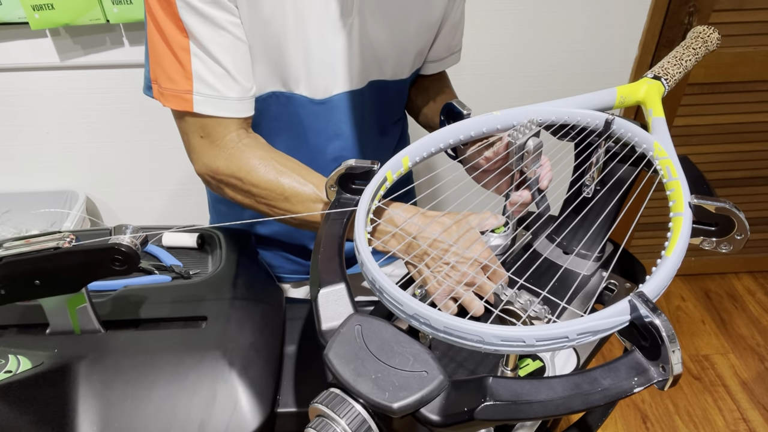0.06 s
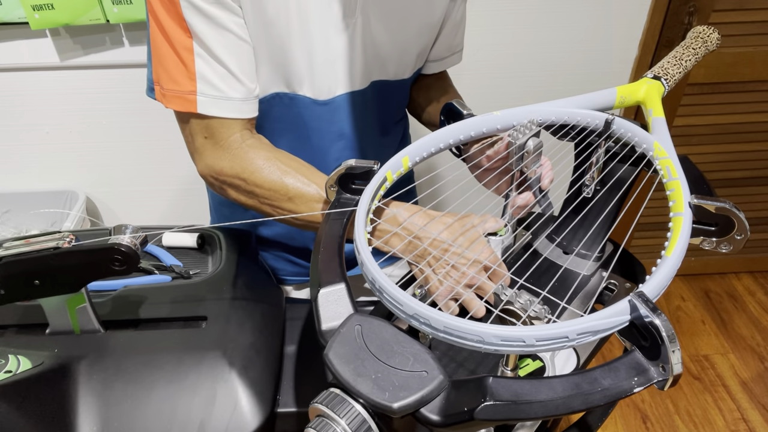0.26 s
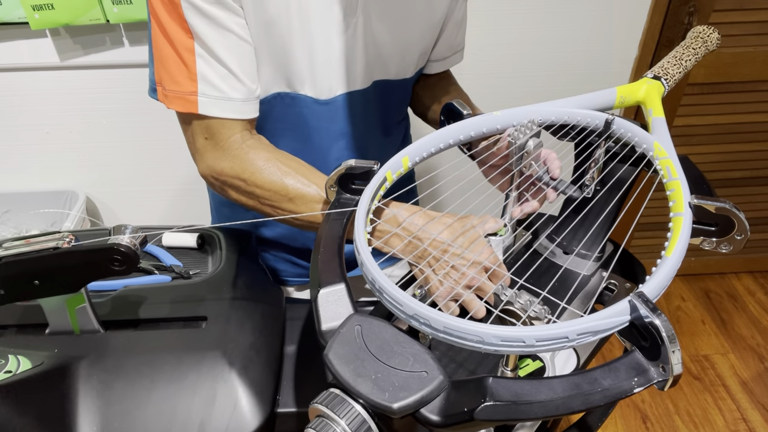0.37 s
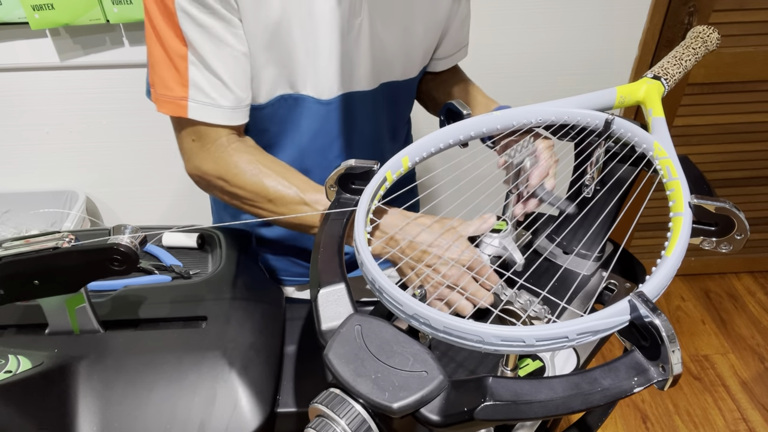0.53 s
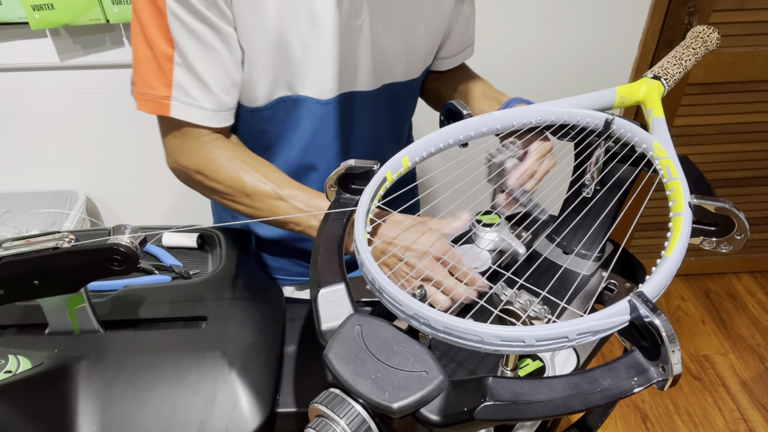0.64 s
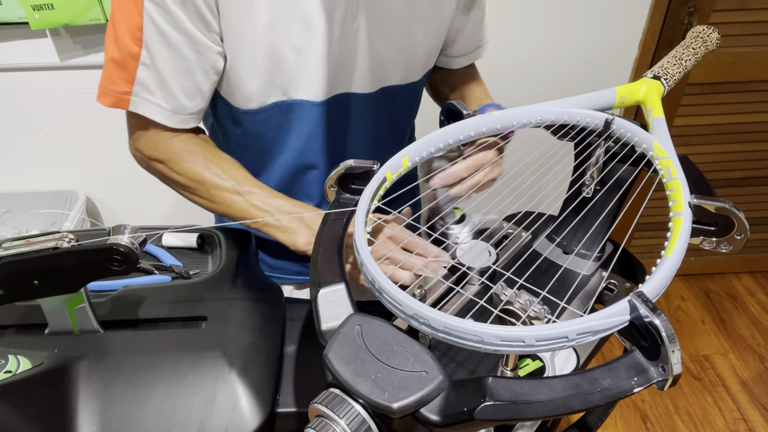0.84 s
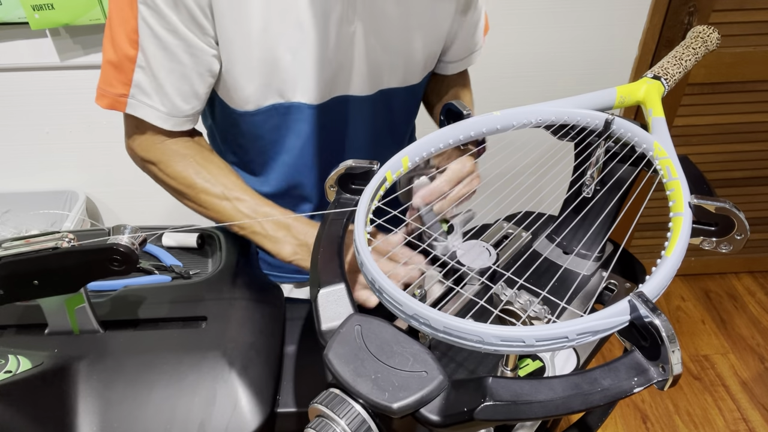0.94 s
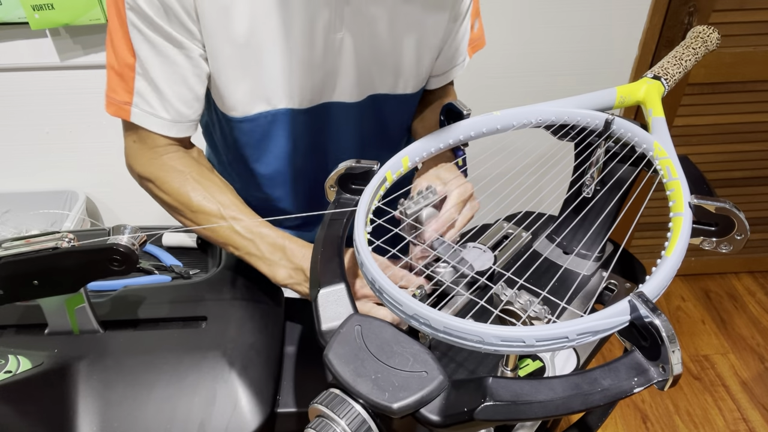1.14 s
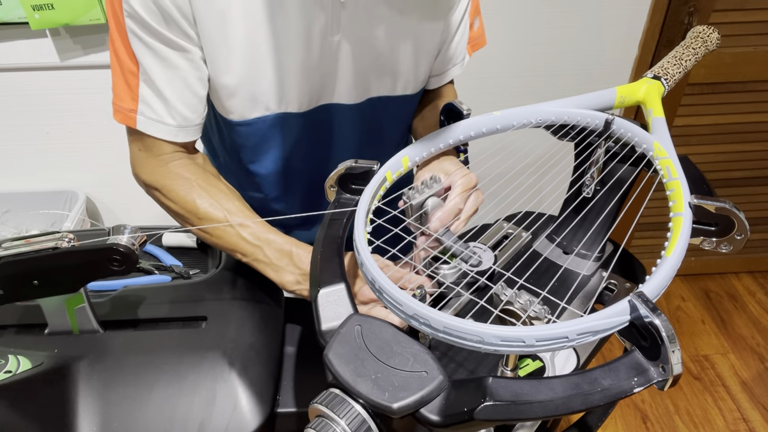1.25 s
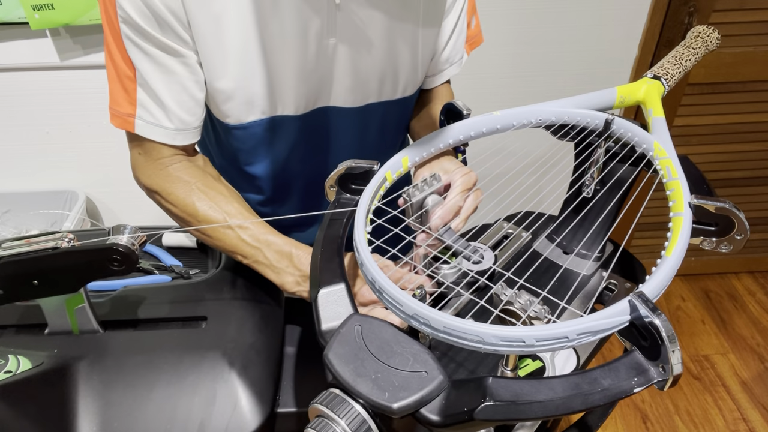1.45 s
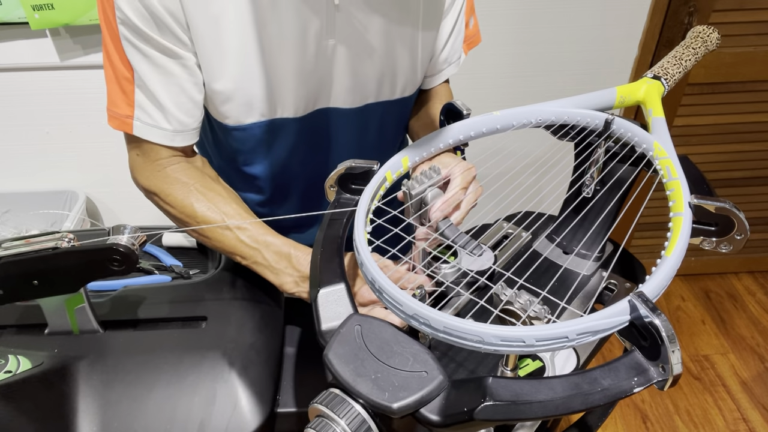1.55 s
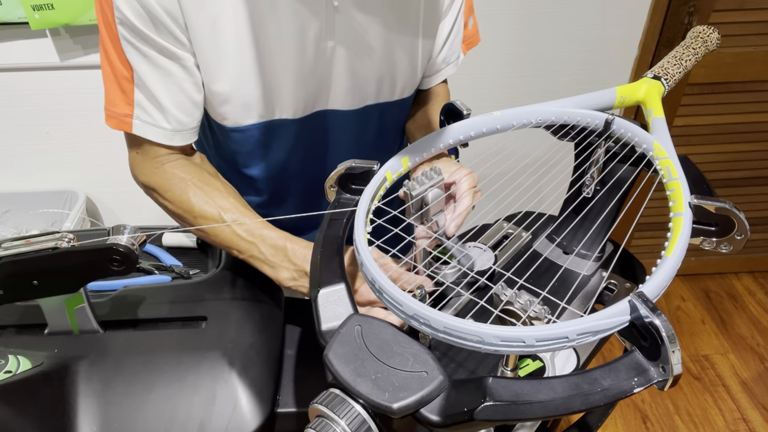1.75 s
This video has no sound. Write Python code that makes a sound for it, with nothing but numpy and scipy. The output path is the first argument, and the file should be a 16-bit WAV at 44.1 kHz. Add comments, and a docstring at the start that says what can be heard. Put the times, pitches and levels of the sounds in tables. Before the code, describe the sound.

Close to the microphone in a small, live room, a stringing machine's metal clamp clacks open, chatters along a rail and clacks shut. Softer metal clinks follow as the clamps are reset, with ventilation humming underneath.

```python
"""A racquet is strung on a stringing machine in a small, live room, close to a stereo microphone.
Over a low ventilation hum, a steel clamp snaps open at 0.23 s in a quick series of impacts. It slides
along its rail with friction and chatter, then locks at 0.6 s with a clack that excites the low modes
of the turntable. From 0.9 s fingers reset the clamps: a catch drops in, jaws clink, and the rail
rattles faintly until only the hum is left."""
import sys
import numpy as np
from scipy import signal
from scipy.fft import rfft, irfft, next_fast_len
from scipy.io import wavfile
from scipy.ndimage import map_coordinates

SR = 44100
rng = np.random.default_rng(int(sys.argv[2]) if len(sys.argv) > 2 else 0)


def put_to_file(sound):
    """Save the sound as 16-bit audio at rate SR, in the file named by the first command-line argument."""
    columns = np.atleast_2d(sound).T  # one column per channel
    safe = np.clip(columns, -1, 1)
    whole_steps = np.round(safe * 32767)
    wavfile.write(sys.argv[1], SR, whole_steps.astype(np.int16))


N = 79380
T = np.arange(N) / SR

# Levels are relative; t60 is the time a vibration takes to fall by 60 dB.
# Lever contacts on opening and on locking. Each row: start in seconds, level in dB, t60 in seconds.
RELEASE_CONTACTS = [(.2288, -19, 0.087), (.2324, -11.5, 0.01), (.2355, -16, 0.019), (.2404, -7.5, 0.021),
                    (.2455, -21.5, 0.024)]
LOCK_CONTACTS = [(.6001, -25, 0.072), (.6054, -15.5, 0.0041), (.6065, -8.5, 0.016), (.6088, -13, 0.013)]
# Normal modes of the struck parts. Each row: frequency in Hz, level in dB, t60 in seconds.
STEEL_MODES = [(6076, -12.5, 0.04), (8770, 1.5, .04), (9000, -2, 0.0074), (10050, 2, 0.051),
               (10840, -4.5, 0.027), (12470, -9.5, 0.045)]
CLAMP_BASE_MODES = [(1010, -37.5, 0.059), (1087, -16.5, 0.041), (1205, -24.5, 0.1)]
TURNTABLE_MODES = [(145.5, -3, 0.44), (165.4, -2.5, 0.24), (233.8, 1, 0.26), (303, -3.5, 0.24),
                   (364.3, -3, 0.38), (451, 2, 0.28), (476, 2.5, 0.21), (585, -13, .24), (721, -9.5, .21)]  # with the racquet
CATCH_MODES = [(1053, -37.5, 0.046), (2330, -30.5, 0.027), (2650, -33, .018), (3310, -30.5, 0.026),
               (3550, -31, 0.027), (4300, -39, 0.022), (5900, -33.5, 0.044)]
JAW_MODES = [(1295, -4, 0.049), (1960, 1, 0.02), (2750, -2, 0.026), (5920, -11, 0.05)]
JAW_PING = (3345, -1, 0.029)  # a single row
# Blows that reach the turntable. Each row: start in seconds, level in dB, tilt in dB per octave.
TURNTABLE_BLOWS = [(.25, -37, -7), (.608, -26.5, 1), (.626, -26.5, -2.5), (1.029, -42.5, 6.5)]
# Touches on the jaws. Each row: start in seconds, ring level in dB, tilt in dB per octave,
# extra ping level in dB, click level in dB.
JAW_TOUCHES = [(0.5494, -35, 0, -20, -53), (0.973, -41, 3, -2, -39.5), (0.984, -41, -3, -12, -47),
               (1.0255, -43, -7, -15, -35.5), (1.104, -45, -12, -8, -47), (1.242, -56.5, -3, -8, -46),
               (1.287, -43.5, -5.5, 9, -47), (1.504, -46.5, -2.5, 2, -46.5), (1.568, -37.5, -6, -12, -43.5),
               (1.605, -44, -18, -1.5, -47.5), (1.676, -42, 1.5, 1.5, -52), (1.762, -51, 0, 2, -50)]
# Light knocks of the clamps. Each row: start in seconds, click level in dB, an unused value,
# click t60 in seconds, ring frequency in Hz, ring level in dB.
CLAMP_KNOCKS = [(.079, -41.5, -1, 0.013, 1396, -48.5), (0.375, -47, 14, 0.019, 1083, -36.5),
                (0.439, -48.5, 6, 0.014, 2044, -37.5), (.444, -33, 6, 0.0079, 1850, -35),
                (0.458, -44.5, -10, 0.024, 1737, -36), (0.4883, -29.5, -2, 0.05, 1325, -30.5),
                (.494, -27, -2, 0.014, 3080, -28), (0.526, -41.5, -5, 0.025, 1810, -33.5),
                (0.5706, -40, 9.5, 0.11, 3190, -26), (0.639, -26.5, -16, 0.025, 1875, -28),
                (1.033, -46, -22, 0.015, 489, -35.5), (1.530, -55.5, 6, 0.081, 1432, -50)]
# Movements along the rail. Each row: start in seconds, length in seconds, level in dB.
RAIL_SLIDES = [(0.208, 0.025, -51.5), (0.49, 0.11, -53), (0.911, 0.13, -57.5), (0.949, 0.18, -58),
               (1.121, 0.168, -71), (1.488, 0.15, -63), (1.66, 0.32, -74)]
# Wavering and throbbing tones of the ventilation. Each row: frequency in Hz, level in dB.
HUM_TONES = [(86.1, -59), (119.5, -58)]
THROB_TONES = [(206, -53.5), (238, -57.5)]
# Noise spectra of the sources. Each row: frequency in Hz, spectral density in dB.
RELEASE_SPECTRUM = [(100, -39), (300, -7.5), (750, -4), (1700, 1.5), (2600, -2), (4200, -3.5), (7500, 0.5),
                    (9500, 8.5), (12000, -1.5), (14500, 1)]
LOCK_SPECTRUM = [(100, -14.5), (500, -10.5), (1100, 3), (2300, -6), (3500, -2), (5400, 0.5), (7500, -9),
                 (9500, -1.5), (12000, -8.5), (14500, -8)]
THUD_SPECTRUM = [(40, -30.5), (80, -14), (145, 6), (300, -4), (560, -1), (900, -6), (4000, -49)]
CLINK_SPECTRUM = [(300, -4), (1200, 5.5), (3600, 3.5), (4700, -3.5), (6000, -17.5), (9500, -23),
                  (14500, -37)]
TICK_SPECTRUM = [(100, -13.5), (500, -8), (1100, 4.5), (2000, 1.5), (3400, 2), (4600, -1), (6000, -4.5),
                 (9500, -1.5), (14500, -19)]
SLIDE_SPECTRUM = [(100, -12), (500, -0.5), (1300, -3.5), (3200, -9.5), (6000, -16), (9500, -21.5),
                  (14500, -31.5)]
AIR_SPECTRUM = [(20, -38), (45, -3), (70, -3), (130, 0), (230, -0.5), (330, -7.5), (450, -14.5),
                (700, -25.5), (1400, -30), (6000, -49.5), (15000, -57.5)]
# Reverberation time of the room. Each row: frequency in Hz, t60 in seconds.
ROOM_T60 = [(150, 0.8), (1000, 0.48), (3000, 0.42), (7000, 0.48), (14000, 0.41)]
# Level of the reverberant tail, with a dip near 7.7 kHz and a dull top that are not the room's own.
# Each row: frequency in Hz, level in dB.
TAIL_LEVEL = [(150, 6.5), (500, 6), (1200, -4), (3000, 0.5), (6200, -4), (7700, -15), (9500, -11),
              (14500, -9), (15600, -23.5)]
# Left-right coherence of near and diffuse sound. Each row: frequency in Hz, coherence from 0 to 1.
NEAR_COHERENCE = [(200, 0.95), (1100, 0.68), (2200, 0.52), (4500, 0.16), (9500, 0.48), (13000, 0.99)]
ROOM_COHERENCE = [(200, 0.86), (500, 0.26), (1100, 0.081), (4500, 0.14), (9500, 0.25), (13000, 0.94)]
# Phase between the microphone ports. Each row: frequency in Hz, lead of the left in radians.
MAIN_PHASE = [(200, 0.14), (1100, 0.28), (2200, -1), (4500, -3.5), (8500, -10), (10500, -4), (11300, -7),
              (15000, -5.5)]
JAW_PHASE = [(300, 0.5), (2700, -1.78), (3330, -5), (3570, -6), (5900, -10)]  # the jaws sound from another side
# Balance of the ports. Each row: frequency in Hz, left minus right in dB.
PORT_BALANCE = [(200, 1), (600, -1), (1500, -1.5), (4000, -0.2), (12000, 0.25)]


def lever(contacts, spectrum, ring_db):
    """Impact excitation: each contact gives a crack and rings the steel; the cracks add in power."""
    envelope = np.sqrt(sum((amp(db) * fade(s, t60)) ** 2 for s, db, t60 in contacts))
    crack = envelope * rippled(noise(spectrum))
    return crack + sum(amp(db + ring_db) * ring(s, STEEL_MODES) for s, db, _ in contacts)


def clamp_base():
    """Free vibration: the base rings on after the locking blow."""
    return ring(.6066, CLAMP_BASE_MODES)


def turntable(attack_s=0.0047, pivot_hz=287):
    """Structure-borne sound: each blow draws a dull thud and low modes from the heavy frame."""
    out = np.zeros((2, N))
    for s, db, tilt_db in TURNTABLE_BLOWS:
        thud = amp(-1.5) * fade(s, t60=0.23, attack_s=attack_s) * noise(THUD_SPECTRUM, ROOM_COHERENCE)
        modes = amp(-4) * ring(s, TURNTABLE_MODES, attack_s)
        tilt = lambda hz: amp(tilt_db * np.log2(np.clip(hz / pivot_hz, .5, 2)))
        out += filtered(amp(db) * (modes + thud), tilt)
    return out


def catch():
    """Free vibration: the second clamp's steel catch drops in and rings at its natural frequencies."""
    return np.tile(ring(0.95, CATCH_MODES, attack_s=0.00061), (2, 1))


def jaw_clinks(pivot_hz=2004):
    """Modal excitation: the hardness and place of a touch set how strongly each jaw mode rings."""
    click, out = noise(CLINK_SPECTRUM), np.zeros((2, N))
    ping_hz, ping_db, ping_t60 = JAW_PING
    for s, db, tilt_db, extra_db, click_db in JAW_TOUCHES:
        modes = [*JAW_MODES, (ping_hz, ping_db + extra_db, ping_t60)]
        tilted = [(hz, db + level + tilt_db * np.log2(hz / pivot_hz), t60) for hz, level, t60 in modes]
        out += ring(s, tilted, attack_s=0.0008)
        out += amp(click_db) * fade(s, t60=0.031, attack_s=0.00026) * click
    return out


def clamp_ticks(ring_t60=0.037):
    """Light impact: a brief contact radiates a broadband click and excites one damped resonance."""
    click, out = rippled(noise(TICK_SPECTRUM)), np.zeros((2, N))
    for s, click_db, _, t60, hz, ring_db in CLAMP_KNOCKS:
        out += amp(click_db) * fade(s, t60) * click
        out += ring(s, [(hz, ring_db, ring_t60)], attack_s=0.00099)
    return out


def rail_slides(contacts_per_s=200, scatter_db=3.5, rub=.9, ramp_s=0.011):
    """Sliding friction: metal rubs steadily on the rail and chatters in tiny random contacts."""
    contacts = rng.random(N) < contacts_per_s / SR
    strengths = amp(-scatter_db * rng.standard_normal(N))
    chatter = unit(signal.fftconvolve(contacts * strengths, fade(0, t60=.02))[:N])
    push = sum(amp(db) * np.clip(np.minimum(T - s, s + length - T) / ramp_s, 0, 1)
               for s, length, db in RAIL_SLIDES)
    return push * (chatter + rub) * noise(SLIDE_SPECTRUM)


def ventilation(air_db=-52, waver_hz=8):
    """Flow noise: air rushes low, beside tones that waver at random in amplitude and phase."""
    out = amp(air_db) * noise(AIR_SPECTRUM, ROOM_COHERENCE)
    for hz, db in HUM_TONES:
        knots = rng.standard_normal((2, 128))
        sine_gain, cosine_gain = [map_coordinates(k, [T * waver_hz], mode="wrap") for k in knots]
        phase = 2 * np.pi * hz * T
        out += amp(db) * unit(sine_gain * np.sin(phase) + cosine_gain * np.cos(phase))
    return out


def ventilation_throb(swing_db=7.5, first_peak_s=.04, period_s=.13):
    """Amplitude modulation: a low drone swells about eight times a second."""
    swell = amp(swing_db * np.cos(2 * np.pi * (T - first_peak_s) / period_s))
    return swell * sum(amp(db) * np.sin(2 * np.pi * (hz * T + rng.random())) for hz, db in THROB_TONES)


def in_room(x, wet_db, rise_s=0.0022):
    """Reverberation: each band stores the energy of x and returns it as decaying diffuse noise."""
    hz, t, direct = signal.stft(x, SR, nperseg=256)
    power = np.mean(np.abs(direct) ** 2, axis=0)
    build_up = 1 - np.exp(-(t / rise_s) ** 2)
    decay = amp(-60 * t / along(ROOM_T60, hz)[:, None]) ** 2 * build_up
    decay /= decay.sum(axis=1, keepdims=True)
    stored = np.abs(signal.fftconvolve(power, decay, axes=1)[:, :len(t)])
    diffuse = signal.stft(spread(rng.standard_normal((2, N)), ROOM_COHERENCE), SR, nperseg=256)[2]
    tail = diffuse / np.std(diffuse) * np.sqrt(stored) * amp(along(TAIL_LEVEL, hz) + wet_db)[:, None]
    return x + signal.istft(tail, SR, nperseg=256)[1][:, :N]


def at_ports(x, phase, pan_db=0):
    """Direction of arrival: the two microphone ports differ in level and phase."""
    sides = np.array([[.5], [-.5]])
    gain = lambda hz: amp(sides * (along(PORT_BALANCE, hz) + pan_db))
    return filtered(x, lambda hz: gain(hz) * np.exp(1j * sides * along(phase, hz)))


def ring(s, modes, attack_s=0.00064):
    """Superposition: damped modes start at time s, with random phases and slightly random levels."""
    return sum(amp(db + rng.normal(0, 1)) * fade(s, t60, attack_s)
               * np.sin(2 * np.pi * (hz * (T - s) + rng.random())) for hz, db, t60 in modes)


def fade(s, t60, attack_s=0.00032):
    """Damping: the envelope of a blow rises at time s, then decays exponentially."""
    age = np.maximum(T - s, 0)
    return amp(-60 * np.minimum(age / t60, 4)) * (1 - np.exp(-age / attack_s))


def rippled(x, depth_db=4, step_hz=253.9, from_hz=2200):
    """Modal overlap: crowded, short-lived modes leave peaks and gaps in the treble."""
    knots = rng.uniform(-1, 1, size=512) * np.sqrt(3)  # unit variance
    ripple_db = lambda hz: depth_db * map_coordinates(knots, [hz / step_hz], mode="wrap")
    return unit(filtered(x, lambda hz: amp(ripple_db(hz) * np.clip(hz / from_hz - 1, 0, 1))))


def noise(spectrum, coherence=NEAR_COHERENCE):
    """Spectral shaping: white noise becomes coloured stereo noise of rms 1."""
    pair = filtered(rng.standard_normal((2, N)), lambda hz: amp(along(spectrum, hz)))
    return unit(spread(pair, coherence))


def spread(pair, coherence):
    """Partial coherence: two independent signals mix as mid and side into left and right."""
    angle = lambda hz: np.arccos(np.clip(along(coherence, hz), 0, 1)) / 2
    mid, side = filtered(pair, lambda hz: np.array([np.cos(angle(hz)), np.sin(angle(hz))]))
    return np.array([mid + side, mid - side])


def filtered(x, response):
    """Linear filtering: the spectrum of x is multiplied by a frequency response."""
    size = next_fast_len(N + SR // 4)
    return irfft(rfft(x, size) * response(np.fft.rfftfreq(size, 1 / SR)), size)[..., :N]


def along(points, hz):
    """Interpolation of (Hz, value) points on a logarithmic frequency axis."""
    freqs, values = np.transpose(points)
    return np.interp(np.log(hz + 1), np.log(freqs + 1), values)


def unit(x):
    """Normalisation to rms 1."""
    return x / np.sqrt(np.mean(x ** 2) + 1e-20)


def amp(db):
    """Amplitude ratio of a level in decibels."""
    return 10 ** (np.asarray(db) / 20)


def scene():
    """Superposition: clamps, frame, reverberation and ventilation add at the microphone."""
    release = in_room(lever(RELEASE_CONTACTS, RELEASE_SPECTRUM, ring_db=-9), wet_db=-1.5)
    lock = in_room(lever(LOCK_CONTACTS, LOCK_SPECTRUM, ring_db=-30) + clamp_base(), wet_db=-2)
    handling = in_room(clamp_ticks() + rail_slides(), wet_db=0.5)
    jaws = in_room(jaw_clinks(), wet_db=-6) + in_room(catch(), wet_db=-7)
    main = release + lock + turntable() + handling + ventilation() + ventilation_throb()
    return at_ports(main, MAIN_PHASE) + at_ports(jaws, JAW_PHASE, pan_db=-1)


def record(dry, edge_hz=14800, top_hz=16300):
    """Band limiting: the highest treble fades to silence between edge_hz and top_hz."""
    return filtered(dry, lambda hz: np.clip((top_hz - hz) / (top_hz - edge_hz), 0, 1) ** 2)


dry = scene()
out = record(dry)
put_to_file(out)
```